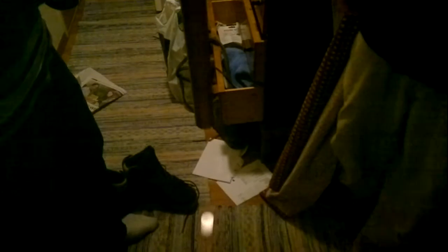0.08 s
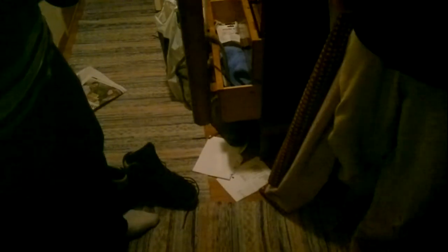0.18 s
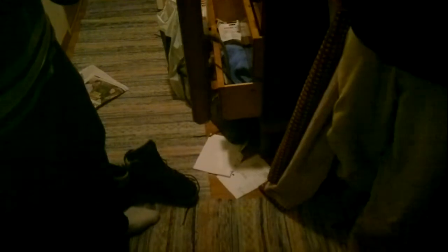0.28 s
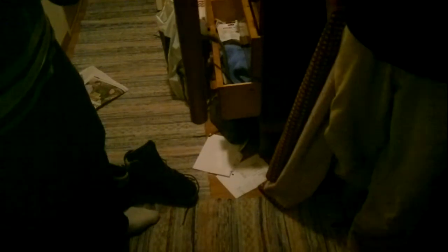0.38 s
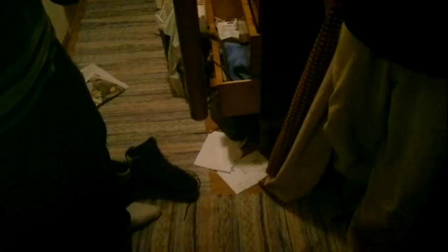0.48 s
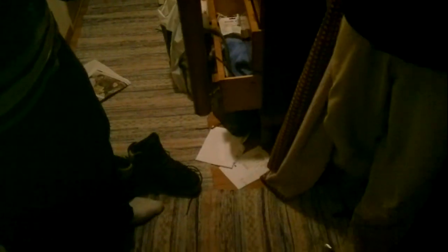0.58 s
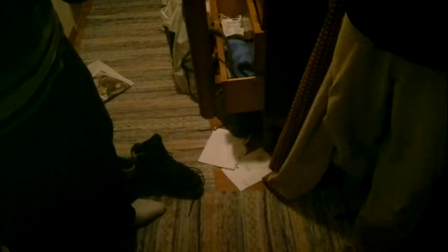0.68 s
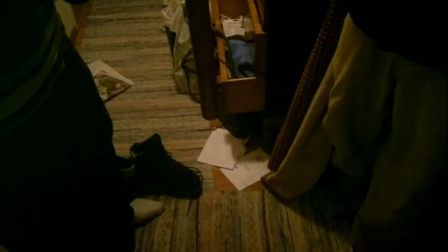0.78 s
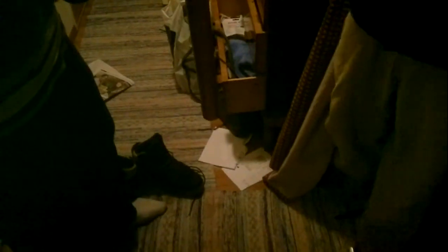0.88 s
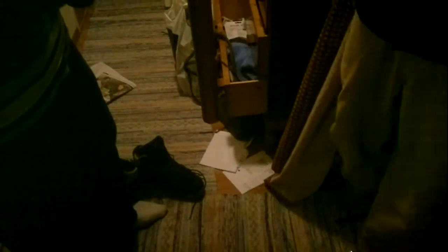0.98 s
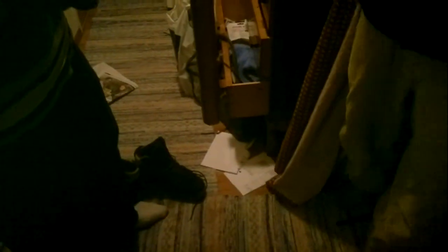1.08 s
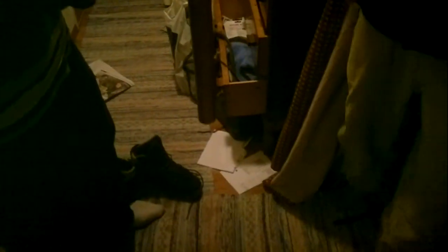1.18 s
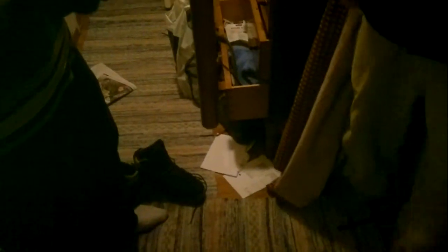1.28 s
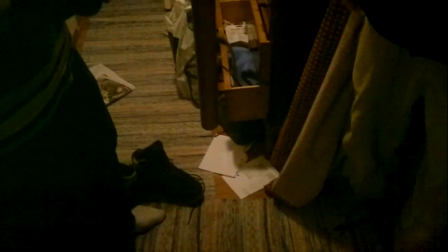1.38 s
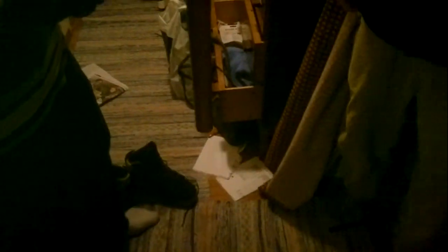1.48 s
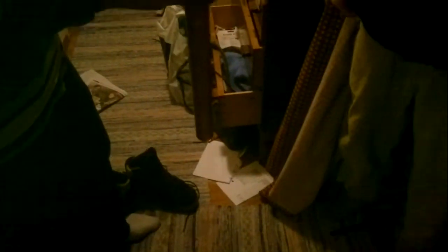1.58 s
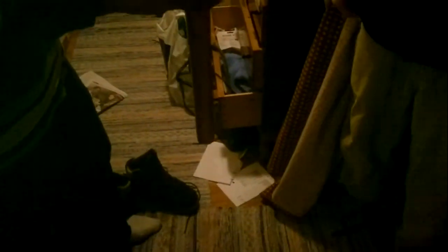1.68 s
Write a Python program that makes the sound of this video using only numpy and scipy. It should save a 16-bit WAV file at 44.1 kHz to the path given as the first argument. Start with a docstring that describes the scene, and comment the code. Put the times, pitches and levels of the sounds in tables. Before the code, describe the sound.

A heavy magnet clacks onto a wooden floor and bounces twice, followed by light clicks.

```python
"""Over quiet room noise and a faint rustle, a heavy magnet falls out of a pipe onto a boarded floor in a small
furnished room. It lands with a hard clack that sets the boards' modes ringing, then comes down twice more with
duller knocks, as longer contacts pass less treble; the high background then rises faintly again. Then the pipe
is handled: hand and sleeve rustle by friction, the pipe scrapes briefly and gives light clicks, and among the
clicks something padded makes one low bump."""
import sys
import numpy as np
from scipy import signal
from scipy.io import wavfile
from scipy.ndimage import uniform_filter1d, minimum_filter1d

SR = 44100
rng = np.random.default_rng(int(sys.argv[2]) if len(sys.argv) > 2 else 0)


def pcm_store(signal):
    """Save signal as 16-bit PCM."""
    levels = np.round(np.clip(np.atleast_2d(signal), -1, 1) * 32767)
    wavfile.write(sys.argv[1], SR, levels.astype(np.int16).T)


N = 74970
TIME = np.arange(N) / SR

# Steady room noise: (frequency [Hz], relative spectral density [dB])
ROOM_SPECTRUM = [(25, -8), (45, 3.5), (80, -4), (150, -9.5), (300, -12), (600, -15), (1100, -14),
                 (1600, -26), (3000, -34), (5000, -41.5), (9000, -44.5), (15500, -51.5)]
# Likeness of left and right: (frequency [Hz], correlation [-1 to 1])
STEREO_CORRELATION = [(40, .7), (150, 0.71), (500, 0.88), (1000, 0.65), (1800, -0.09), (4000, -0.12),
                      (12000, -0.0043)]
# Rustles of hand and sleeve, and at 4540 Hz a faint rise of the high background after the knocks: # (start [s],
# peak [s], end [s], level [dB], centre [Hz], width [octaves], pan, left minus right [dB])
NOISE_SWELLS = [(0.0, 0.201, 0.28, -62.5, 503, 0.9, 1), (0.562, 0.78, 0.79, -58, 999, 0.07, -3.5),
                (0.844, 0.899, 1.04, -55.5, 1961, 0.06, -0.5), (0.85, 0.91, 1.24, -57.5, 933, 0.4, -5),
                (0.871, 1.027, 1.36, -72, 3780, 0.79, 10), (0.954, 0.99, 1.11, -55, 232, 0.97, 2),
                (1.042, 1.112, 1.34, -52, 386, 0.6, 1), (1.163, 1.186, 1.38, -64, 1050, 0.49, -8.5),
                (1.384, 1.415, 1.6, -63.5, 1007, 0.29, -6), (0.555, 0.66, 0.94, -80, 4540, 0.52, 2.5),
                (1.298, 1.52, 1.76, -61, 72.6, 1.37, 2)]
# Brief scrapes of the pipe: (start [s], length [s], level [dB], resonance [Hz])
PIPE_SCRAPES = [(0.858, 0.013, -53, 2000), (0.893, 0.034, -58.5, 1960)]
# Contacts of the padded thing as it settles: (time [s], level [dB], contact cut-off [Hz])
BUMP_CONTACTS = [(1.184, -15, 400), (1.196, -2, 454), (1.2303, -7, 308)]
# Its modes: (frequency [Hz], level [dB], t60 [s], pan [dB])
PADDED_MODES = [(52.3, -40.5, 0.37, -23.5), (78, -33, 0.35, -3), (110.7, -23.5, 0.18, -10.5),
                (162, -21, 0.034, -2), (247.5, -33.5, 0.121, -8), (336.4, -36, 0.11, -5)]
# Clicks of the handled pipe: (time [s], level [dB], tilt [dB/octave], resonance [Hz],
# resonance boost [dB], cut-off [Hz], reverberation level [dB], pan before shadowing [dB])
PIPE_CLICKS = [(0.887, -61.5, 2.5, 5030, 5, 12000, -5, 11), (0.894, -49.5, 2, 3800, 0, 12000, -0.5, 4.5),
               (0.95, -54, 5, 4300, -1, 12000, -0.5, 4), (0.9656, -32.5, -1, 2430, 8.5, 5230, -7, 12.5),
               (1.104, -47, -8.5, 2300, 13, 12000, 2, 3), (1.187, -46, -4.5, 1427, 7.5, 12000, 2, -11),
               (1.4739, -51, -8, 770, 10, 2000, -14.5, -4), (1.497, -49, -0.5, 1900, 9, 12020, -10.5, -10),
               (1.554, -45.5, 3, 4730, -0.5, 14000, -3, 11.5),
               (1.5648, -48, 2, 3770, 10.5, 12220, -6.5, -12.5)]
# Their colour and reverberation: (frequency [Hz], relative spectral density [dB], t60 [s])
CLICK_SPECTRUM = [(97.7, -10.5, 0.15), (291, 3.5, 0.35), (617, 9.5, 0.067), (1030, 2, 0.34),
                  (1490, -4, 0.23), (2300, -0.5, 0.11), (2960, -11, 0.094), (4240, -13.5, 0.12),
                  (6500, -30, 0.12), (10700, -38, 0.078), (16000, -50, .05)]
# Treble is shadowed more on the far side: (frequency [Hz], factor on a click's pan [ratio])
PAN_SHADOW = [(300, 0.14), (1800, 0.098), (3200, 0.78), (10000, 2.84)]
# The pipe's wall, damped by the hand: (frequency [Hz], level re a click [dB], t60 [s], pan [dB])
PIPE_WALL_MODES = [(606, -8, 0.07, 8), (785, -19, 0.029, 3), (2410, -16, 0.028, -8),
                   (4195, -23, 0.047, 6.5)]
# First reflections from the walls: (delay [s], level [dB])
WALL_ECHOES = [(0.022, -10), (0.054, -19)]
# A dull thud in the room: (frequency [Hz], relative spectral density [dB])
THUD_SPECTRUM = [(60, -25.5), (150, 4), (240, 10.5), (350, 8), (470, 7), (650, -12.5), (850, -16),
                 (1200, -33.5), (5000, -95.5)]
# The magnet meets the floor: (time [s], board level [dB], contact cut-off [Hz],
# share of the second spot [0-1], knock [Hz], knock level [dB], clack level [dB], clack cut-off [Hz],
# tick [Hz], tick level [dB], pan [dB])
MAGNET_BLOWS = [(0.2069, 5, 1780, 0.27, 542, -3.5, -16, 6800, 2680, -37.5, -2),
                (0.4303, 3.5, 928, 0.96, 477.4, -10.5, -44.5, 2600, 3900, -68, -2.5),
                (0.5680, -11, 950, 0.9, 444, -22.5, -54.5, 2330, 3030, -72, -2)]
# Floor boards, whose close pairs of modes beat:
# (frequency [Hz], t60 [s], level at the landing spot [dB], level at the second spot [dB], pan [dB])
FLOOR_MODES = [(46.6, 0.3, -43, -40, -4.5), (61.4, 0.19, -26.5, -37, -4.5), (96.7, 0.24, -27, -42, -12),
               (142.25, 0.286, -31.5, -25, -2), (159, 0.26, -36, -23.5, -2.5), (184, 0.073, -28.5, -17, 1),
               (205.3, 0.19, -15, -24.5, 1.5), (268.1, 0.23, -4, -29.5, 0.5), (276.7, 0.13, -6.5, -30, -1),
               (303.2, 0.24, -8, -29.5, -2.5), (351.5, 0.17, -6.5, -24, 3.5), (391, 0.067, -18.5, -16, 2.5),
               (513, 0.29, -30.5, -46.5, -10.5), (550.3, 0.21, -1.5, -46.5, 3),
               (578, 0.39, -12.5, -49, 2.5), (648.3, 0.11, -13.5, -38.5, 12.5), (731, 0.043, -43, -27, -2),
               (725, 0.028, -29, -17, 2), (774, 0.23, -35.5, -49.5, 1.5), (930, 0.088, -7.5, -52.5, 3),
               (1050, 0.077, -34.5, -50.5, -1.5), (1108, 0.28, -26, -52, 4),
               (1170, 0.13, -23.5, -48.5, -8.5), (1295, 0.12, -24, -46.5, 5.5)]
# The clack's reverberant wash: (frequency [Hz], relative spectral density [dB], t60 [s])
WASH_SPECTRUM = [(60, -3.5, .35), (156.6, 1.5, 0.37), (283, 14.5, 0.28), (580, 8.5, 0.36), (876, -2.5, 0.4),
                 (1120, -1.5, 0.22), (1880, -10, 0.29), (2670, -13, 0.18), (3700, -13.5, 0.177),
                 (4650, -26, 0.19), (6860, -35, 0.117), (10000, -58.5, 0.042)]
# The first instant of contact: (frequency [Hz], relative spectral density [dB])
CRACK_SPECTRUM = [(300, 4.5), (700, 2.5), (1300, -8), (2000, -8), (2800, -14), (4000, -28.5), (7000, -50.5),
                  (10000, -70)]

ROOM_NOISE_DB = -59
SLIPS_PER_S, SCRAPE_WIDTH_HZ = 770, 63
CLICK_SNAP_T60_S, CLICK_RING_OCTAVES = 0.01, 0.44
THUD_T60_S, BUMP_THUD_DB, FLOOR_THUD_DB = 0.29, -45, -28  # levels relative to each contact
KNOCK_T60_S = 0.033  # the board right under the magnet, heavily damped
CRACK_DB, CRACK_T60_S = 3, 0.058  # level relative to the wash
TICK_T60_S, TICK_OCTAVES = 0.035, 0.1  # the bright tick of the metal edge
WASH_RISE_S, WASH_HOLD_S, WASH_CURVE = 0.0082, 0.024, 0.99
WASH_DRIFT_DB_PER_S, WASH_DRIFT_LIMIT_DB = 62.5, 3  # the wash moves to the right
WASH_TOP_HZ, WASH_TOP_HALVING_S = 9060, 0.072
LIMIT_DB, LIMITER_ATTACK_S, LIMITER_RELEASE_DB_PER_S = -2.4, 0.00053, 499.5
MIC_LOW_CUT_HZ, STOPBAND_HZ = 19, 16800

# Third-octave filter bank [Hz], steeper above 1 kHz
EDGES = 25 * 2 ** (np.arange(29) / 3)
CENTRES = np.sqrt(EDGES[1:] * EDGES[:-1])
BANDS = [signal.butter(4 if low > 1000 else 2, (low, high), "band", fs=SR, output="sos")
         for low, high in zip(EDGES, EDGES[1:])]


def from_db(db):
    """Amplitude ratio of a level in decibels."""
    return 10 ** (np.asarray(db) / 20)


def panned(pan_db):
    """Left and right gains: a level difference gives direction."""
    return from_db(np.array([[.5], [-.5]]) * pan_db)


def at_hz(points, hz, column=1):
    """Interpolation of a table's column on a log-frequency axis."""
    table = np.array(points)
    return np.interp(np.log(hz), np.log(table[:, 0]), table[:, column])


def lowpass(x, hz, order=2):
    """Low-pass filtering, as when a longer contact passes less treble."""
    return signal.sosfilt(signal.butter(order, hz, fs=SR, output="sos"), x + 1e-18)


def decay(t, t60, hold=0, curve=1):
    """Damping: silent before zero, held, then a decay that is exponential when curve is 1."""
    return (t >= 0) * 1000. ** (-(np.maximum(t - hold, 0) / t60) ** curve)


def resonance_db(hz, octaves):
    """Band levels of one resonance, falling away on both sides."""
    away = np.log2(CENTRES / hz) / octaves
    return -20 * np.log10(1 + away ** 2 / 2 + (away / 2) ** 4)


def shaped_noise(spectrum_db, envelope, size):
    """Partly correlated stereo noise in third octaves, rms about 1 where envelope(Hz) is 1."""
    gains = from_db(spectrum_db)
    gains = gains / np.sqrt(np.sum(gains ** 2 * np.diff(EDGES)) * 2 / SR)
    white, out = rng.standard_normal((2, 2, size)), 0
    for k, hz in enumerate(CENTRES):
        alike = at_hz(STEREO_CORRELATION, hz)
        mid, side = white[k % 2]  # adjacent bands are independent
        pair = np.sqrt((1 + alike) / 2) * mid + np.sqrt((1 - alike) / 2) * side * [[1], [-1]]
        out = out + gains[k] * signal.sosfilt(BANDS[k], pair * envelope(hz) + 1e-18)
    return out


def add(out, onset, sound):
    """Superposition of a sound on the mix, from an onset in seconds."""
    start = int(onset * SR)
    out[:, start:start + sound.shape[1]] += sound[:, :out.shape[1] - start]


def ring(onset, modes):
    """Free vibration: struck modes are damped sinusoids, neighbours starting in opposite directions."""
    t = TIME - onset
    return sum((-1) ** k * from_db(db) * panned(pan) * np.sin(2 * np.pi * hz * t) * decay(t, t60)
               for k, (hz, db, t60, pan) in enumerate(modes))


def echoed(x):
    """Early reflection: the walls return delayed, weaker copies."""
    out = x.copy()
    for delay, db in WALL_ECHOES:
        add(out, delay, from_db(db) * x)
    return out


def room_noise():
    """Stationary noise, strongest in the bass, forms the room's background."""
    noise = shaped_noise(at_hz(ROOM_SPECTRUM, CENTRES), lambda hz: 1, N + SR // 4)
    return from_db(ROOM_NOISE_DB) * noise[:, -N:]


def room_thud(t):
    """Reverberation: low-pitched noise dies away exponentially after a contact."""
    return shaped_noise(at_hz(THUD_SPECTRUM, CENTRES), lambda hz: decay(t, THUD_T60_S), len(t))


def rustles_and_hiss():
    """Amplitude-modulated noise bands: friction rustles, and one faint rise of the high background noise."""
    out = np.zeros((2, N))
    for start, peak, end, db, hz, octaves, pan in NOISE_SWELLS:
        t = start + TIME[:int((end - start) * SR)]
        swell = np.sqrt(np.interp(t, [start, peak, end], [0, 1, 0]))
        noise = shaped_noise(resonance_db(hz, octaves), lambda hz: swell, len(swell))
        add(out, start, from_db(db) * panned(pan) * noise)
    return out


def scrapes():
    """Stick-slip friction: quick uneven slips excite one narrow resonance of the pipe."""
    out = np.zeros((2, N))
    for start, length, db, hz in PIPE_SCRAPES:
        slips = (rng.random(N) < SLIPS_PER_S / SR) * rng.standard_normal((2, N))
        tone = signal.lfilter(*signal.iirpeak(hz, hz / SCRAPE_WIDTH_HZ, fs=SR), slips + 1e-18)
        swell = np.sin(np.pi * np.clip((TIME - start) / length, 0, 1))
        out += from_db(db) * tone / tone.std() * swell
    return out


def bump():
    """Soft impact: long contacts excite a padded thing's low modes and leave a thud in the room."""
    out = np.zeros((2, N))
    for onset, db, contact_hz in BUMP_CONTACTS:
        out += from_db(db) * lowpass(ring(onset, PADDED_MODES), contact_hz)
        add(out, onset, from_db(db + BUMP_THUD_DB) * room_thud(TIME[:N // 4]))
    return out


def clicks():
    """Impulsive excitation: each light contact gives a snap, reverberation and a ring of the pipe wall."""
    out, t = np.zeros((2, N)), TIME[:SR // 4]
    snap = decay(t, CLICK_SNAP_T60_S)
    for onset, db, tilt_db, ring_hz, ring_db, top_hz, reverb_db, pan in PIPE_CLICKS:
        def envelope(hz):
            reverb = from_db(reverb_db) * decay(t, at_hz(CLICK_SPECTRUM, hz, column=2))
            return panned(pan * at_hz(PAN_SHADOW, hz)) * (snap + reverb)

        boost_db = ring_db / (1 + (np.log2(CENTRES / ring_hz) / CLICK_RING_OCTAVES) ** 2)
        colour_db = at_hz(CLICK_SPECTRUM, CENTRES) + tilt_db * np.log2(CENTRES) + boost_db
        click = shaped_noise(colour_db, envelope, len(t))
        add(out, onset, from_db(db) * lowpass(click, top_hz, order=3))
        out += from_db(db) * ring(onset, PIPE_WALL_MODES)
    return out


def clack_wash(t):
    """A diffuse field builds as reflections arrive; it quickly grows duller as its cut-off falls."""
    drift = panned(-np.minimum(WASH_DRIFT_DB_PER_S * t, WASH_DRIFT_LIMIT_DB))
    build_up = np.minimum(t / WASH_RISE_S, 1) ** 2
    top_hz = WASH_TOP_HZ * .5 ** (t / WASH_TOP_HALVING_S)

    def envelope(hz):
        treble_cut = 1 / np.sqrt(1 + (hz / top_hz) ** 24)
        t60 = at_hz(WASH_SPECTRUM, hz, column=2)
        return build_up * drift * treble_cut * decay(t, t60, WASH_HOLD_S, WASH_CURVE)

    return shaped_noise(at_hz(WASH_SPECTRUM, CENTRES), envelope, len(t))


def magnet():
    """Hard impact: the point struck weights the boards' modes, and contact time limits the treble."""
    out, t = np.zeros((2, N)), TIME[:N // 3]
    crack_decay, tick_decay = decay(t, CRACK_T60_S), decay(t, TICK_T60_S)
    for (onset, board_db, contact_hz, share, knock_hz, knock_db,
         clack_db, clack_hz, tick_hz, tick_db, pan) in MAGNET_BLOWS:
        modes = [(hz, board_db + (1 - share) * first_db + share * second_db, t60, mode_pan + pan)
                 for hz, t60, first_db, second_db, mode_pan in FLOOR_MODES]
        knock = echoed(ring(onset, [(knock_hz, knock_db, KNOCK_T60_S, pan)]))
        out += lowpass(ring(onset, modes) + knock, contact_hz, order=4)
        wash = clack_wash(t)
        thud = lowpass(room_thud(t), contact_hz, order=4)  # sent round the room by the second spot
        add(out, onset, share * from_db(board_db + FLOOR_THUD_DB) * thud)
        crack = shaped_noise(at_hz(CRACK_SPECTRUM, CENTRES), lambda hz: crack_decay, len(t))
        clack = lowpass(wash + from_db(CRACK_DB) * echoed(crack), clack_hz, order=6)
        add(out, onset, from_db(clack_db) * panned(pan) * clack)
        tick = shaped_noise(resonance_db(tick_hz, TICK_OCTAVES), lambda hz: tick_decay, len(t))
        add(out, onset, from_db(tick_db) * tick)
    return out


def limiter(x):
    """Look-ahead limiting: the gain falls just before each loud peak and recovers quickly."""
    peak_db = 20 * np.log10(np.abs(x).max(axis=0) + 1e-9)
    over_db = np.maximum(peak_db - LIMIT_DB, 0)
    recovery_db = LIMITER_RELEASE_DB_PER_S * TIME
    gain_db = recovery_db - np.maximum.accumulate(over_db + recovery_db)
    width = int(LIMITER_ATTACK_S * SR)
    held_db = minimum_filter1d(gain_db, 2 * width)
    smooth_db = uniform_filter1d(uniform_filter1d(held_db, width), width)
    return x * from_db(smooth_db)


def scene():
    """Superposition of the room, the fall and the handling."""
    return room_noise() + magnet() + clicks() + scrapes() + bump() + rustles_and_hiss()


def record(dry):
    """Band and peak limiting: the microphone loses deep bass, the landing is held down, the top is cut."""
    heard = signal.sosfilt(signal.butter(3, MIC_LOW_CUT_HZ, "high", fs=SR, output="sos"), dry)
    return signal.sosfilt(signal.cheby2(12, 70, STOPBAND_HZ, fs=SR, output="sos"), limiter(heard))


dry = scene()
out = record(dry)
pcm_store(out)
```